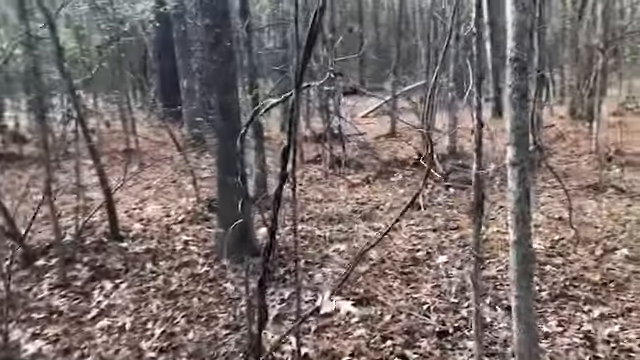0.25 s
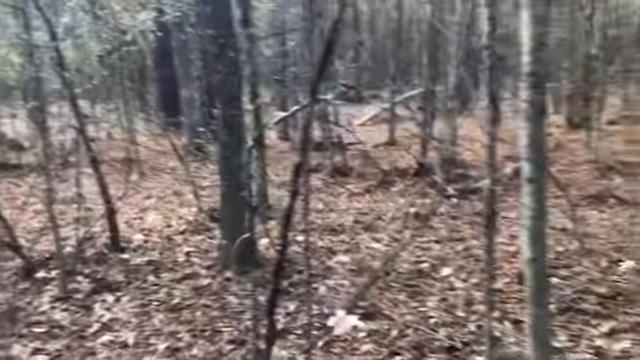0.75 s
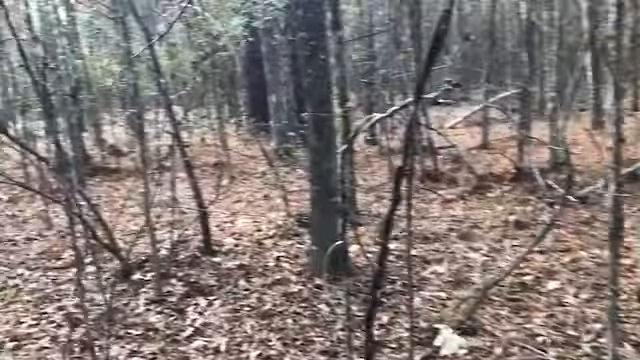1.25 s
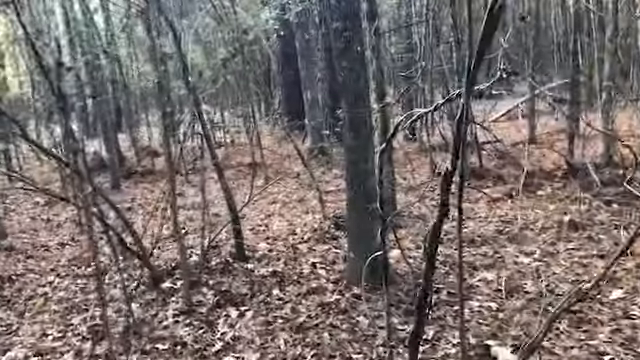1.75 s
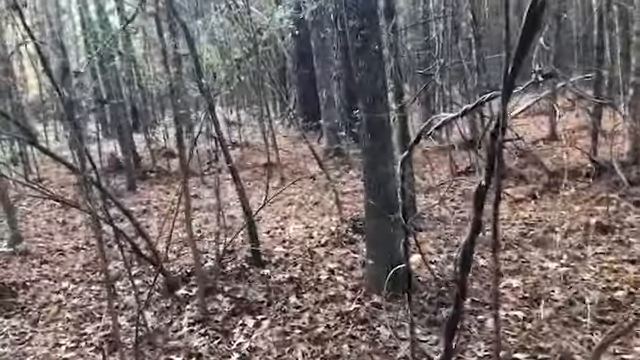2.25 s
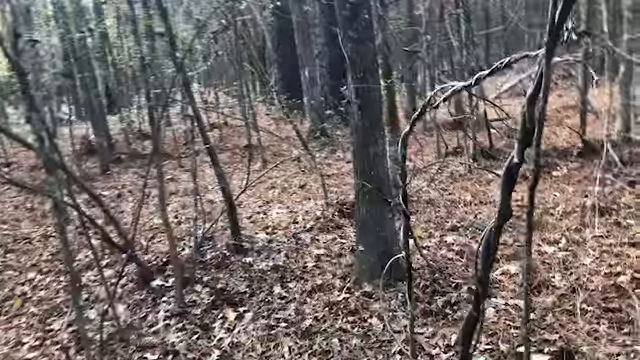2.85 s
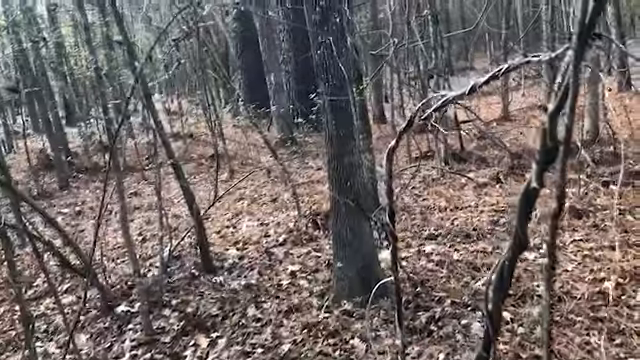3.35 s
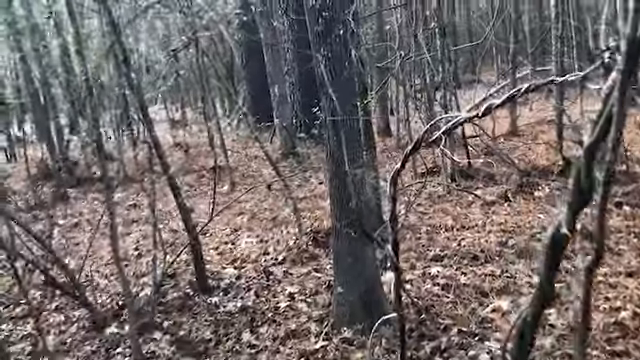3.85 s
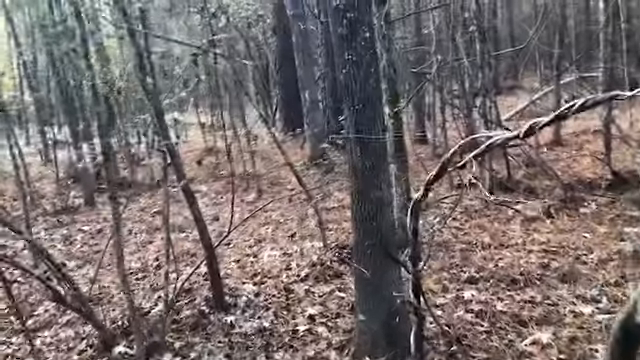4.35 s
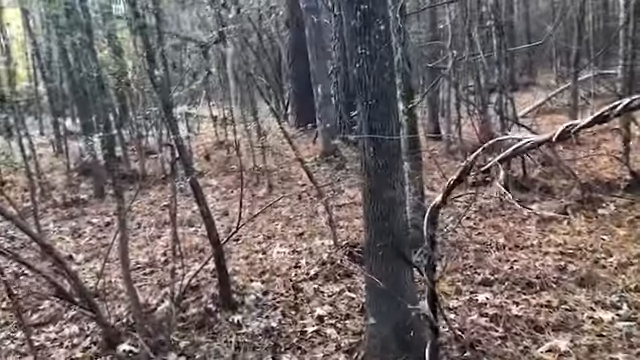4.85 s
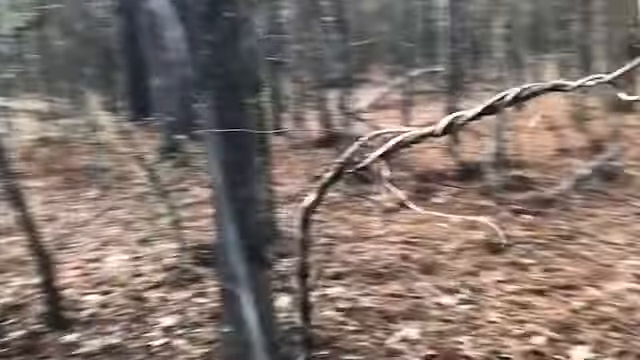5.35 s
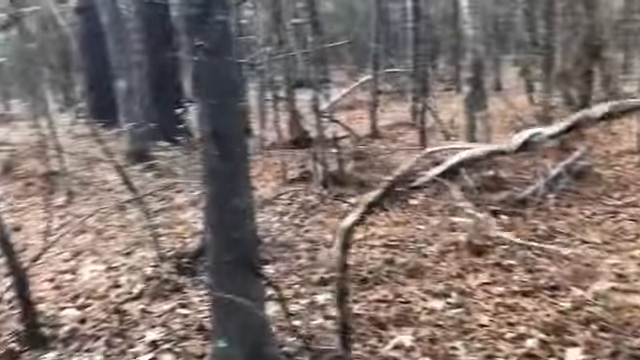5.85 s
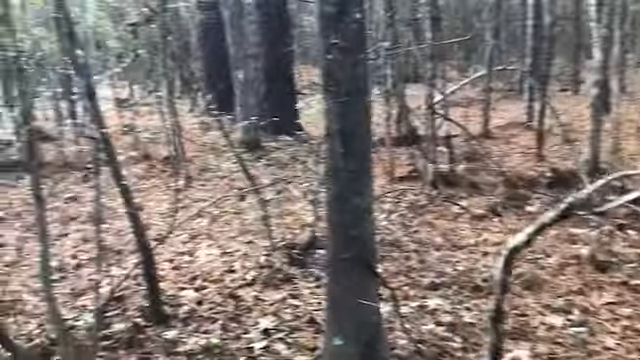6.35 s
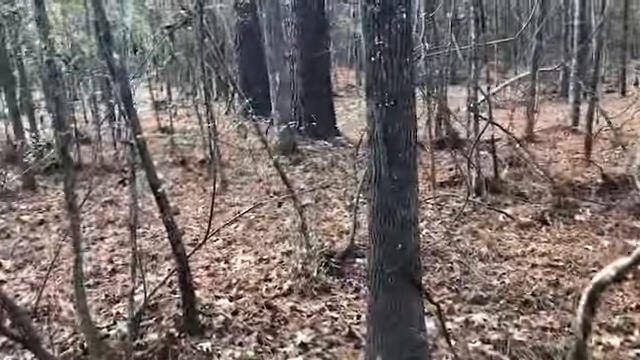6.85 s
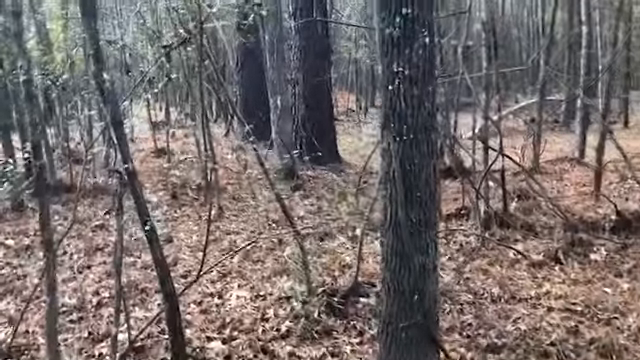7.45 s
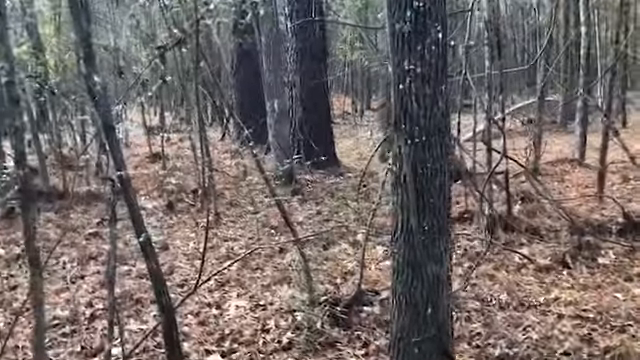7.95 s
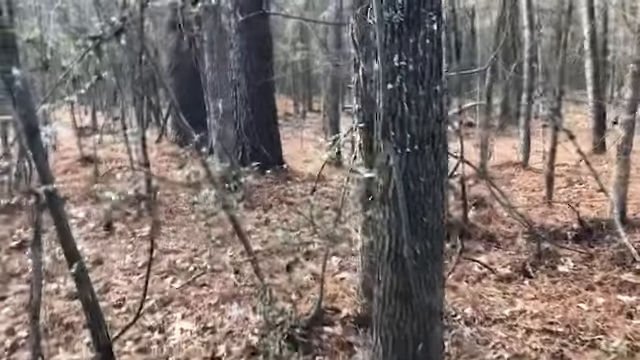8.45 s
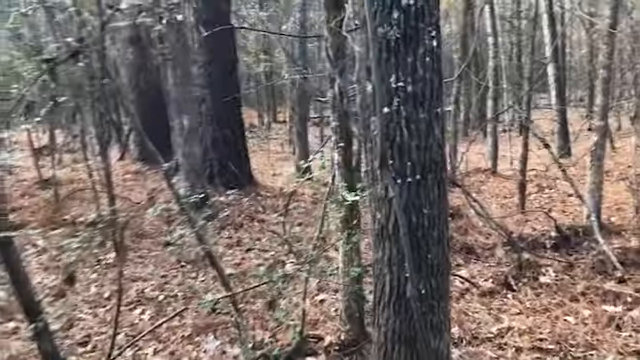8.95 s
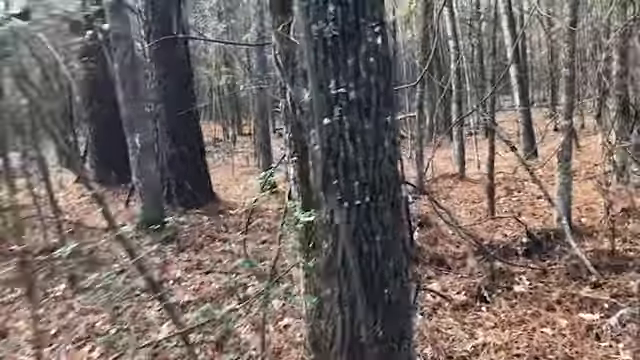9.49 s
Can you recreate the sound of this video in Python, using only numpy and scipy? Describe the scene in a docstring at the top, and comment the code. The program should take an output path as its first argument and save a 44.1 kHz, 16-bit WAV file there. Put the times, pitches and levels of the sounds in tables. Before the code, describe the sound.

Someone walks slowly over dry fallen leaves, each step crackling and snapping, with faint distant traffic and a low engine drone.

```python
"""Nine slow steps through dry forest leaves, heard from a hand-held phone. From the start each tread
crushes a dense bed of small cracks, with single leaf snaps and hollow twig knocks; a far engine hums
over traffic rumble. From 0.7 s onward a faint steady leaf rustle is heard through the pauses, with
brief rustles on top. Loud snaps stand out at 2.7 s and 6.6 s while the engine note creeps upward.
The heaviest tread comes last, just after 9 s."""
import sys
import numpy as np
from scipy import signal
from scipy.fft import rfft, irfft, next_fast_len
from scipy.io import wavfile
from scipy.ndimage import uniform_filter1d, map_coordinates

SR = 44100
rng = np.random.default_rng(int(sys.argv[2]) if len(sys.argv) > 2 else 0)


def persist_wave(psi):
    """Save psi, clipped to +-1, as 16-bit WAV."""
    counts = np.round(np.clip(psi, -1, 1) * 32767).astype(np.int16)
    wavfile.write(sys.argv[1], SR, np.atleast_2d(counts).T)


N = 428639

# breaking-leaf bands, low to high: (frequency [Hz], relative density [dB])
FLEX = [(250, -12), (500, -11.5), (1300, -3), (2050, -1.5), (2900, -8.5), (5000, -58)]
COARSE = [(1200, -58), (2200, -1.5), (3900, 5.5), (6000, 2.5), (8000, -10), (12000, -70)]
FINE = [(4000, -57), (6800, -8), (9400, -3.5), (11500, -6.5), (14000, -5.5), (15400, -4.5), (15800, -2.5)]


def tread():
    """The foot crushes countless small leaves, few loud and many faint, over the rustle of sliding ones."""
    # litter pressed flat: (frequency [Hz], relative density [dB])
    weight_band = [(200, -33), (350, -3.5), (700, 0), (1100, 0), (1500, -15), (2500, -48)]
    t = np.arange(0, N / SR + .002, .002)
    power = sum(amp([db + packed_db, db - 4 - fine_db / 2, db - 0.5 + fine_db / 2, db + weight_db]) ** 2
                for db, packed_db, fine_db, weight_db in loads(t))
    gains = curves(np.c_[t, np.sqrt(power).T])  # flex, coarse, fine, weight
    cracks_per_s = 550
    when, size, flex, fine, decay = rng.random((int(cracks_per_s * N / SR), 5)).T
    size_db = np.minimum(-4.2 * np.log(1 - size), 15)
    crackle = cracks(when * N / SR, size_db, flex_db=18 * (flex - .5), fine_db=18 * (fine - .5),
                     t60_s=0.011 * np.exp(decay - .5))
    slide = slips(per_s=110, t60_s=0.061) * papery(rng.standard_normal(N), patchy_db=2.5)
    bands = [unit(unit(grains) + amp(slide_db) * unit(coloured(slide, band)))
             for grains, band, slide_db in zip(crackle, (FLEX, COARSE, FINE), (3, 0.3, -1.2))]
    bands.append(unit(coloured(bands[0], weight_band)))
    return sum(gain * band for gain, band in zip(gains, bands))


def loads(t):
    """Load on the litter at times t: (crush, packed, fine, weight) in dB for rest, steps and rustles."""
    # leaves settling in the pauses: (level [dB], packed [dB], fine [dB])
    rest = (-71, -2, -5)
    # foot load, one list per step: (time [s], crush [dB])
    steps = [
        [(0.0, -39.5), (0.154, -53), (0.194, -48.5), (0.357, -61)],
        [(1.01, -55), (1.098, -50), (1.135, -45.5), (1.175, -48.5), (1.245, -42.5), (1.311, -47),
         (1.429, -40.5), (1.592, -48.5), (1.768, -50.5), (1.916, -62), (2.05, -70), (2.163, -76)],
        [(2.262, -68), (2.278, -48.5), (2.351, -50.5), (2.405, -44), (2.468, -42.5), (2.574, -43),
         (2.68, -36.5), (2.842, -40), (2.973, -51), (3.177, -56)],
        [(3.584, -55.5), (3.712, -48.5), (3.73, -44), (3.789, -49.5), (3.841, -42.5), (3.977, -43),
         (4.085, -48.5), (4.296, -46), (4.414, -53)],
        [(4.598, -53.5), (4.783, -44.5), (4.943, -46), (5.224, -39), (5.31, -44), (5.472, -50.5), (5.735, -50),
         (5.954, -57)],
        [(6.487, -64), (6.58, -47.5), (6.735, -40), (6.918, -40.5), (6.974, -45), (7.032, -43), (7.234, -51),
         (7.283, -51.5), (7.373, -70)],
        [(7.832, -60), (7.9, -53), (7.964, -41), (8.048, -40.5), (8.066, -46.5), (8.102, -36), (8.163, -38.5),
         (8.339, -40), (8.469, -53)],
        [(8.475, -54), (8.501, -49), (8.69, -46.5), (8.736, -49.5), (8.764, -44), (8.906, -56), (8.95, -60),
         (9.133, -60)],
        [(9.14, -54), (9.162, -48), (9.17, -36), (9.215, -32), (9.335, -39.5), (9.401, -36), (9.457, -45),
         (9.718, -47.5)],
    ]
    # litter per step: (packed re top leaves [dB], fine re coarse [dB], body weight re crush [dB])
    litter = [(-9.5, 2, -14), (-10.5, 2.5, -18), (-10, 3, -26.5), (-10, 0.5, -19), (-9.5, 1.5, -24),
              (-11, 1.5, -23), (-7.5, 2.5, -30), (-9.5, 1, -29), (-10.5, 1.5, -22.5)]
    # (time [s], level [dB], hold [s], 20 dB fade if positive [s], packed [dB], fine [dB])
    # the row at 0.686 s has a negative fade: a faint steady leaf rustle that lasts to the end
    rustles = [(0.383, -54, 0.12, 0.1, -6, 0), (0.686, -61.5, 0.03, -2.2, -4.5, 3),
               (0.782, -51.5, 0.01, 0.2, -6.5, 1), (0.843, -54, 0.17, 0.3, -7, 0),
               (3.2, -54, 0.13, 0.2, -9, -2), (3.504, -53.5, 0.05, 0.1, -2, -4),
               (4.436, -47, 0.028, 0.06, -9, 2), (4.508, -53, 0.025, 0.7, -6.5, -1),
               (5.978, -53.5, 0.05, 0.06, -10, -4), (6.05, -69, 0.2, 0.1, -2, -4),
               (6.362, -54.5, 0.036, 0.1, -12, 0), (7.46, -53.5, 0.11, 0.4, -14, -1.5),
               (7.669, -54, 0.036, 0.3, -9.5, -3)]
    step_fade_s, rustle_rise_s = 0.031, 0.02  # per 20 dB
    full_load_db, no_weight_db = -42.5, -99
    yield *np.add.outer(rest, np.zeros_like(t)), no_weight_db
    for step, (packed_db, fine_db, weight_db) in zip(steps, litter):
        s, db = np.transpose(step)
        outside_s = np.maximum(np.maximum(s[0] - t, t - s[-1]), 0)
        crush_db = np.interp(t, s, db) - 20 * outside_s / step_fade_s
        load_db = np.maximum(crush_db - full_load_db, -30)  # lighter load, duller leaves
        yield crush_db, packed_db - 0.13 * load_db, fine_db + 0.24 * load_db, weight_db
    for s, db, hold_s, fade_s, packed_db, fine_db in rustles:
        drop_db = 20 * np.maximum((s - t) / rustle_rise_s, (t - s - hold_s) / fade_s)
        yield db - np.maximum(drop_db, 0), packed_db, fine_db, no_weight_db


def cracks(s, db, flex_db, fine_db, t60_s):
    """Each fracture is a tearing noise burst with its leaf's own resonances; one output row per band."""
    length, lead = 640, 40  # samples
    t = np.arange(length) / SR
    burst = rng.standard_normal((len(s), length)) * amp(-60 * t / t60_s[:, None]) * (1 - np.exp(-t / .0001))
    # resonances about 1 kHz wide, fading out in the low flex that all leaves share
    humps = unit(uniform_filter1d(rng.standard_normal((len(s), length // 2 + 1)), size=12, axis=1))
    humps *= np.minimum(np.fft.rfftfreq(length, 1 / SR) / 3000, 1)
    burst = np.roll(irfft(rfft(burst) * amp(3 * humps), length), lead, axis=1)
    burst *= (amp(db) / np.abs(burst[:, lead:128]).mean(axis=1))[:, None]  # level over the first 2 ms
    start_s = np.maximum(s - lead / SR, 0)
    bands = (FLEX, flex_db), (COARSE, -fine_db / 2), (FINE, fine_db / 2)
    return np.array([coloured(place(start_s, amp(band_db)[:, None] * burst), band)
                     for band, band_db in bands])


def slips(per_s, t60_s):
    """Leaves give way at once and settle slowly: a gain that jumps and decays, rms 1."""
    jumps = (rng.random(N) < per_s / SR) * rng.exponential(size=N)
    return unit(2.16 + signal.lfilter([1], [1, -amp(-60 / t60_s / SR)], jumps))


def papery(x, patchy_db):
    """Different leaves colour the rustle in turn: patches of random gain in frequency and time."""
    spectra = signal.stft(x, nperseg=256)[2]
    patches = uniform_filter1d(rng.standard_normal(spectra.shape), size=4, axis=0)
    patches = uniform_filter1d(patches, size=8, axis=1)
    return signal.istft(spectra * amp(patchy_db * unit(patches)), nperseg=256)[1][:N]


def snaps():
    """Single loud leaf fractures."""
    # (time [s], level before band trim [dB], flex re crack [dB], fine re coarse [dB])
    fractures = [(0.006, -33, -14, 1), (0.0574, -28, -20, 2), (0.1157, -29, -27, 10), (0.122, -27, -28, 10),
                 (0.177, -35, -23, 12), (0.1866, -28.5, -20, 10), (0.212, -45, 12, 4),
                 (0.328, -44.5, -26, 27), (0.3865, -34.5, -19, -1), (0.3946, -32, -6, 8),
                 (0.4417, -41.5, -7, 3), (0.6176, -49, -15, 13), (0.6744, -45.5, -23, 2),
                 (0.711, -50, 1, -8), (0.78, -39, -12, 7), (0.822, -46, -20, 7), (0.8373, -40.5, -15, 8),
                 (0.902, -39, -8, 4), (0.9448, -37, -11, 0), (0.9698, -40, 2, -8), (1.0855, -39, -14, 2),
                 (1.1, -34.5, -18, -4), (1.1531, -28, -17, -3), (1.1598, -29.5, -15, -4),
                 (1.1915, -31, -15, 0), (1.234, -30.1, -16, 5), (1.2413, -28, -11, 6),
                 (1.2614, -31, -20, 4), (1.2729, -33, -9, 6), (1.3274, -35, -16, 12),
                 (1.3505, -37, -11, 13), (1.373, -36, -20, -3), (1.415, -34.5, -18, 5),
                 (1.5062, -32, 0, 14), (1.5396, -33, -13, -0.5), (1.5562, -31.5, -13, 6),
                 (1.6734, -42, 9, -13), (1.9236, -49, -3, 14), (1.933, -50, -10, 12), (1.978, -50, -4, 12),
                 (2.004, -51, -14, 14), (2.0176, -50, -13, 15), (2.2277, -50, -4, 12), (2.273, -44, 2.5, 0),
                 (2.386, -36, -20, 7), (2.4053, -32, -27, 8), (2.4146, -29, -10, -8), (2.548, -31, -0.5, 8),
                 (2.6148, -28.5, -20, 6), (2.628, -26, -29, 9), (2.646, -30, -19, 11),
                 (2.669, -17, -25, 10), (2.7149, -27.5, 4.5, -2), (2.7307, -28, -11, 9),
                 (2.737, -31, -14, 7), (2.7445, -31, -11, 10), (2.753, -27, -12, 11), (2.7762, -28, -22, 9),
                 (2.8171, -27, -20, 4), (2.822, -27, -6, 10), (2.8487, -22.5, -18, 3),
                 (2.8548, -21.5, -23, 10), (2.9142, -31.5, -24, 10), (2.936, -34, -9, 1),
                 (3.0457, -38, -15, 4), (3.082, -32, -5, -2), (3.1219, -33, -24, 13), (3.4532, -39, -2, 0),
                 (3.8237, -29.5, -2, -2), (3.987, -29, -17, -3), (4.021, -27, -3, 2),
                 (4.1024, -37.5, 5, -4), (4.1635, -37.5, 2, 4), (4.226, -33, -4, 5), (4.2803, -35, -2, -3),
                 (4.296, -33.5, -3, 13), (4.305, -33, -2, 1), (4.3943, -39.5, -7, 5),
                 (4.4403, -36.5, 5, -8), (4.492, -40, -15, 5), (4.519, -34, -17, 5), (4.5355, -36, -4, 5),
                 (4.5582, -39, 1, 8), (4.7833, -32.5, -10, 0), (4.821, -35.5, -20, 13),
                 (5.1645, -35, -3, 0), (5.2123, -34, -5, -3), (5.2513, -32, -1, 5), (5.2856, -30, -21, 0),
                 (5.317, -23, -8, -1), (5.424, -35, -12, 0), (5.4503, -45, 9.5, -11),
                 (6.261, -54.5, 9, -18), (6.559, -35.5, -27, 16), (6.613, -20.5, -14, 2),
                 (6.6307, -33, -24, 14), (6.6526, -37, -21, 14), (6.6756, -30.5, -5, 4),
                 (6.6944, -27.5, -2, 9), (6.8724, -38, -12, 9), (6.9041, -29, -16, 8), (6.951, -37, -10, 7),
                 (7.042, -35.5, -15, 5), (7.07, -35, 0, -7), (7.3059, -41.5, -13, -2),
                 (7.449, -49.5, -13, 9.5), (7.6738, -39.5, 0, -4), (7.9527, -34, 5, 4),
                 (7.9817, -28.5, -16, 7), (8.0078, -32, 1, -3), (8.0295, -35, 7.5, -5),
                 (8.0367, -35, -11, 5), (8.041, -37, -9, -3), (8.046, -31, -14, 10), (8.0578, -32, 8, 0),
                 (8.0856, -24, -1, 3), (8.0941, -25.5, -4, 5), (8.102, -33, -6, 3), (8.1115, -33, -16, 12),
                 (8.1176, -27, -2, 5), (8.1266, -31, -6, 2), (8.1423, -27, -4, 3), (8.1838, -31, 3, -1),
                 (8.2213, -31, -17, 9), (8.233, -28, 0, 0), (8.348, -25.5, -2, 6), (8.3942, -30, 1, -1),
                 (8.4987, -33.5, 4, 3), (8.6114, -34, -20, 5), (8.659, -30.5, -14, 1),
                 (8.696, -31.5, -7, 1), (8.7502, -33.5, -12, 11), (8.8349, -28.5, -4, -1),
                 (8.8696, -40, -17, 2.5), (8.8957, -35.5, -3, -4), (8.903, -42, -15, 11),
                 (8.9743, -48, -13, 11), (9.029, -43, -1, -9), (9.089, -48.5, 14, -24),
                 (9.2175, -27, -8, -1), (9.5906, -25.5, -8.5, 7), (9.6855, -37.5, 0, -6)]
    s, db, flex_db, fine_db = np.transpose(fractures)
    t60_s = 0.0085 * np.exp(0.29 * rng.standard_normal(len(s)))
    band_trim_db = [[-10], [-9.5], [-6.3]]
    return (amp(band_trim_db) * cracks(s, db, flex_db, fine_db, t60_s)).sum(axis=0)


def knocks():
    """Twigs pressed down or struck ring briefly in five inharmonic modes."""
    # (time [s], main mode level [dB], main mode frequency [Hz], t60 [s])
    twigs = [(0.051, -23.5, 960, 0.0082), (0.526, -44, 860, 0.024), (0.53, -44, 1750, 0.025),
             (0.786, -40, 1300, 0.013), (1.243, -32, 1040, 0.0084), (2.413, -26, 2830, 0.012),
             (2.716, -39, 1620, 0.0089), (2.822, -33, 1520, 0.011), (3.988, -34, 1110, 0.019),
             (4.101, -32.5, 1040, 0.014), (4.182, -28.5, 1660, 0.0093), (4.226, -26.5, 900, 0.0095),
             (4.722, -31.5, 742, 0.033), (4.728, -37, 1550, 0.025), (5.021, -35, 787, 0.018),
             (5.164, -22.5, 900, 0.0092), (6.613, -26.5, 2430, 0.012), (7.046, -32, 1540, 0.01),
             (8.22, -27.5, 1580, 0.019), (8.347, -28, 1980, 0.013), (9.172, -37, 1050, 0.013)]
    modes = [(.55, -12), (1, 0), (1.45, -9), (2.1, -7.5), (3.2, -9.5)]  # (frequency ratio, level [dB])
    s, db, hz, t60_s = np.transpose(twigs)[:, :, None]
    t = np.arange(2048) / SR
    wood = sum(amp(mode_db) * np.sin(2 * np.pi * ratio * hz * t) for ratio, mode_db in modes)
    ring = wood * amp(-60 * t / t60_s) * (1 - np.exp(-t / 0.00025))
    return place(s[:, 0], amp(db) * ring)


def echo(x, level_db, t60_s):
    """Short diffuse reflection from the ground and the nearest trunks."""
    t = np.arange(SR // 8) / SR
    tail = rng.standard_normal(len(t)) * amp(-60 * t / t60_s) * np.minimum(t / 0.0023, 1)
    return signal.oaconvolve(x, amp(level_db) * tail / np.linalg.norm(tail))[:N]


def engine():
    """A far engine: one low tone, unsteady in pitch and level."""
    # (time [s], frequency [Hz], level before trim [dB])
    note = [(0, 70.8, -61), (.6, 70.2, -55), (3.1, 70.9, -54.5), (4.3, 72, -53), (6.3, 74.23, -53),
            (8.37, 76, -51), (9.72, 76, -52.5)]
    hz, db = curves(note)
    phase = 2 * np.pi * np.cumsum(hz + 0.66 * wobble(per_s=6.6)) / SR
    return np.sqrt(2) * amp(db - 0.7 + 1.7 * wobble(per_s=5)) * np.sin(phase)


def traffic():
    """A far road: low rumble and midrange roar, slowly varying in level."""
    # (time [s], rumble before trim [dB], roar before trim [dB])
    road = [(0.0, -57, -58), (0.35, -53.5, -60.5), (2.35, -52.5, -59.5), (2.9, -51.5, -57),
            (3.6, -52.5, -57), (4.1, -54, -58.5), (5.0, -53.5, -57), (5.79, -55, -59.5),
            (5.96, -53.5, -61.5), (7.5, -52, -60), (8.5, -52.5, -61), (9.53, -52, -60.5), (9.72, -52, -62)]
    # road spectra: (frequency [Hz], relative density [dB])
    rumble_band = [(15, -67), (25, -39), (35, -21.5), (55, -10), (85, -3), (105, -4), (140, -8.5),
                   (190, -21), (300, -79)]
    roar_band = [(110, -28), (190, 5), (400, 3), (900, -2.5), (1700, -11), (3000, -41)]
    rumble_db, roar_db = curves(road)
    return noise(rumble_band, rumble_db + 1) + noise(roar_band, roar_db + 1.5)


def trees():
    """Faint steady forest hiss."""
    # (frequency [Hz], relative density [dB])
    hiss_band = [(800, -13), (1800, -39), (4000, 16.5), (9000, -37), (16000, 11)]
    return noise(hiss_band, rms_db=-71.5)


def amp(db):
    return 10 ** (np.asarray(db) / 20)


def unit(x):
    return x / np.sqrt(np.mean(x ** 2) + 1e-20)


def curves(rows):
    """One value per sample for each column after the time."""
    s, *columns = np.transpose(rows)
    return [np.interp(np.arange(N) / SR, s, column) for column in columns]


def wobble(per_s):
    """Smooth curve through random knots."""
    return map_coordinates(rng.standard_normal(int(N * per_s / SR) + 4), [np.arange(N) * per_s / SR])


def coloured(x, band):
    """Filter by (Hz, dB) points on a log axis; white noise keeps its level."""
    size = next_fast_len(N + 8192)
    hz, db = np.transpose(band)
    gain_db = np.interp(np.log(np.fft.rfftfreq(size, 1 / SR) + 1), np.log(hz + 1), db)
    return irfft(rfft(x, size) * unit(amp(gain_db)), size)[:N]


def noise(band, rms_db):
    return amp(rms_db) * unit(coloured(rng.standard_normal(N), band))


def place(s, shapes):
    """Add one row of shapes at each time."""
    at = np.round(np.asarray(s) * SR).astype(int)[:, None] + np.arange(shapes.shape[1])
    return np.bincount(at.ravel(), shapes.ravel(), N + shapes.shape[1])[:N]


def scene():
    """Mono mix; only snaps and knocks echo."""
    loud = snaps() + knocks()
    walk = tread() + loud + echo(loud, level_db=-12.5, t60_s=0.06)
    return (walk + engine() + traffic() + trees())[None]


def record(dry):
    """The phone keeps nothing above its band limit."""
    top_hz = 15780
    size = next_fast_len(N + 8192)
    return irfft(rfft(dry, size) * (np.fft.rfftfreq(size, 1 / SR) < top_hz), size)[:, :N]


dry = scene()
out = record(dry)
persist_wave(out)
```